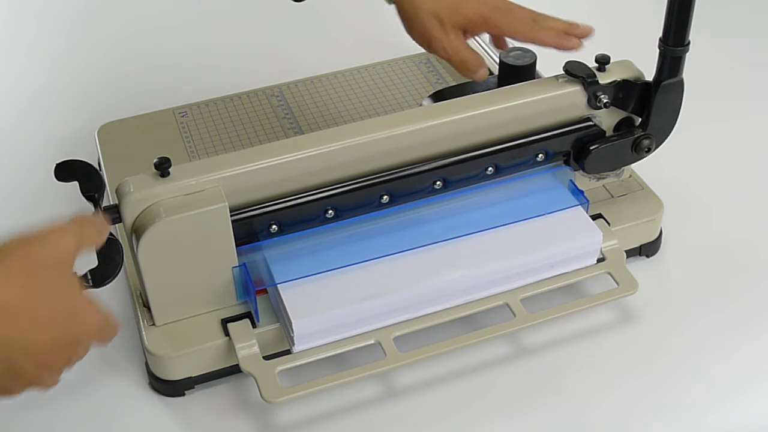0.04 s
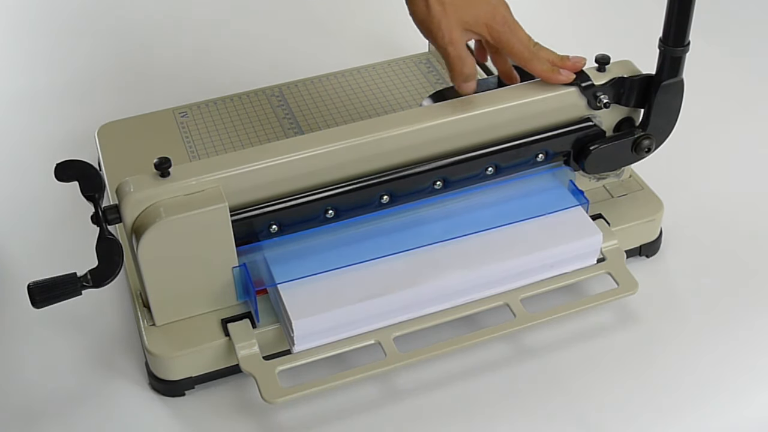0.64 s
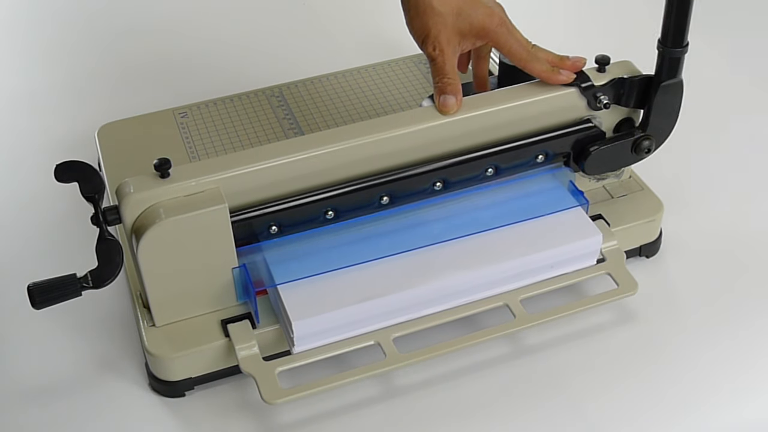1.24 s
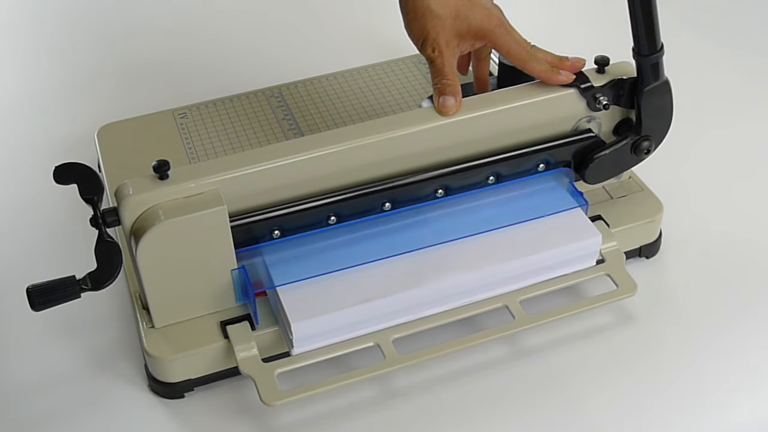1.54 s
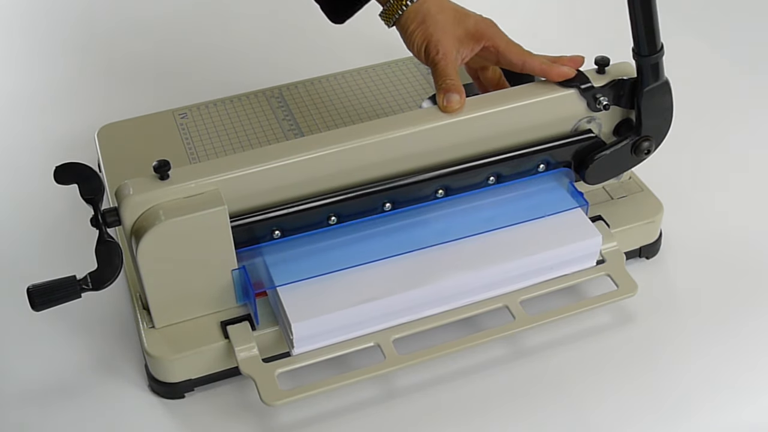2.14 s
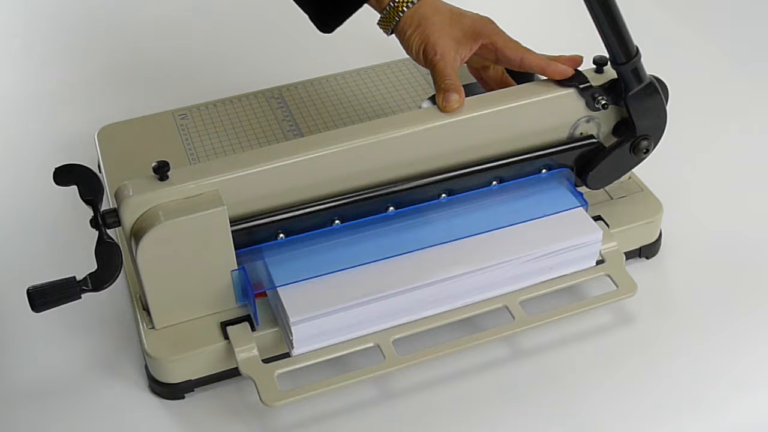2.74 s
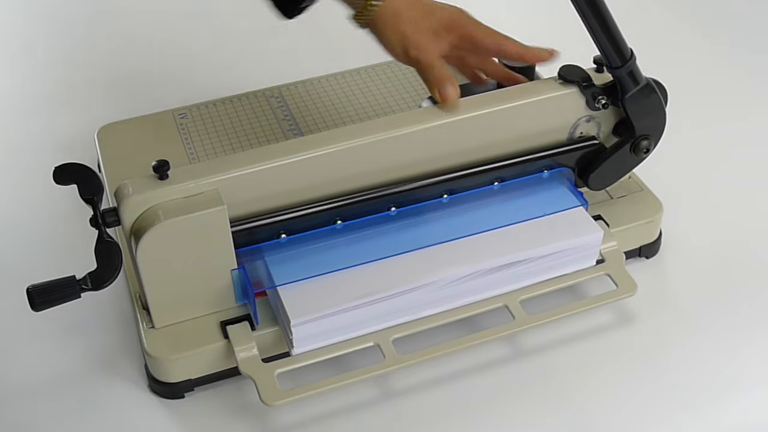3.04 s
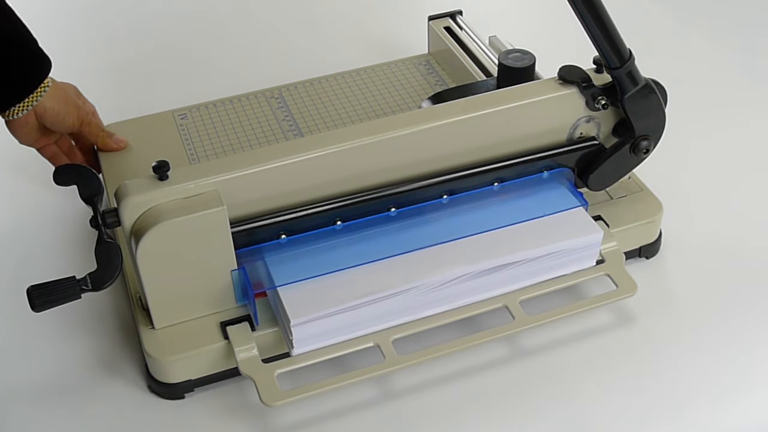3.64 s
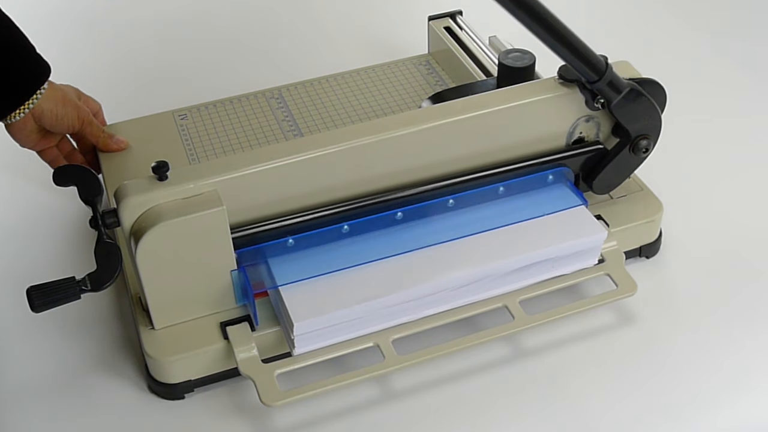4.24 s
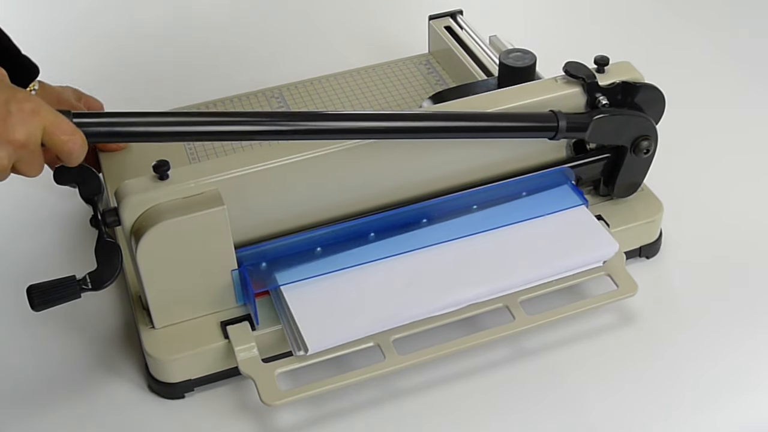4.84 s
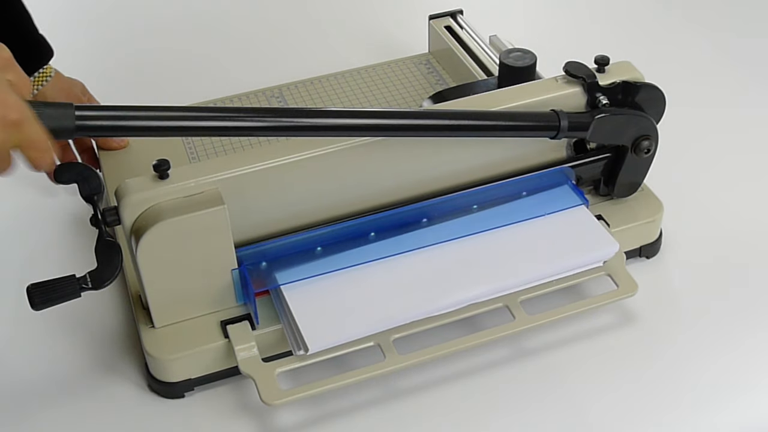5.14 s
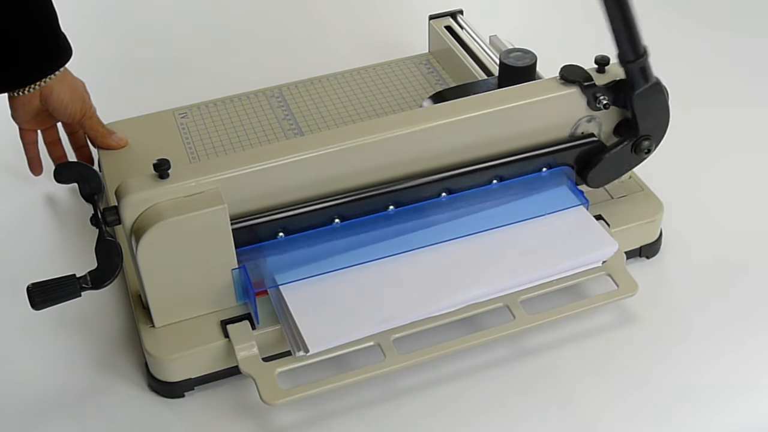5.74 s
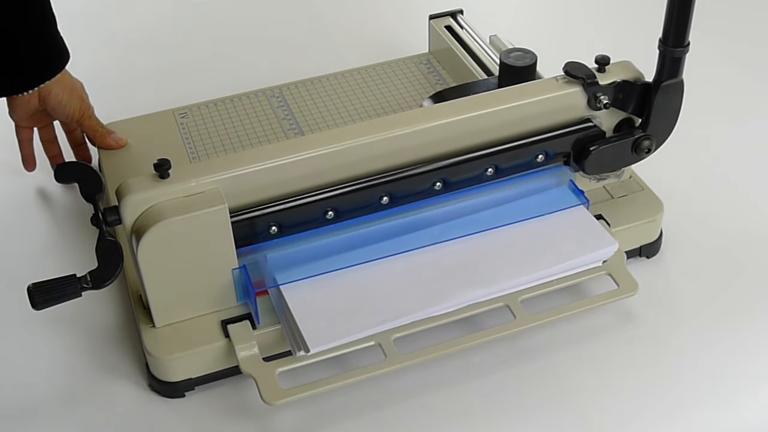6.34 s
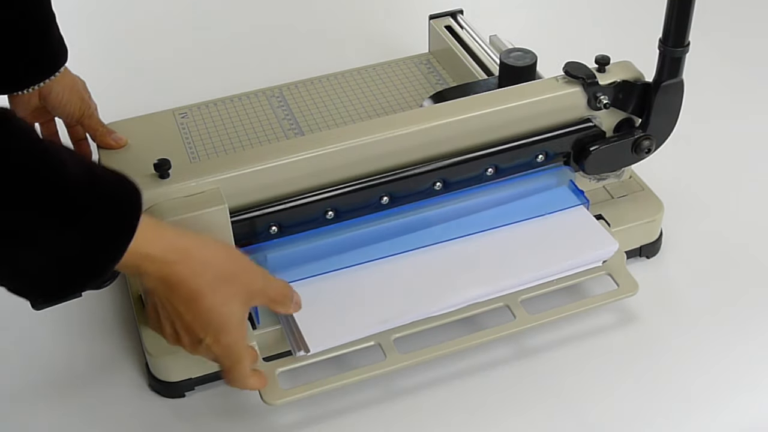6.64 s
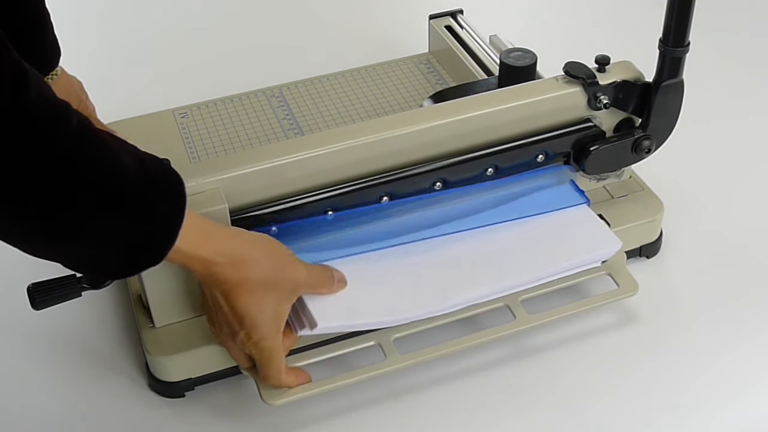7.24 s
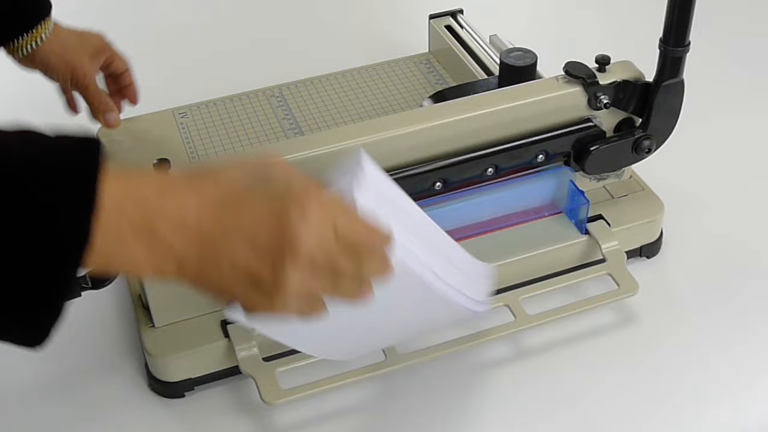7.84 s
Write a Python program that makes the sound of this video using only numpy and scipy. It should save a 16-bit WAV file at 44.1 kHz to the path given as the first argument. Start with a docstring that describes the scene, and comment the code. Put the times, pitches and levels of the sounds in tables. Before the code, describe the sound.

A heavy steel paper guillotine is worked on a table, heard close up in a bare room with short reverberation and a faint hum. At 0.2 seconds a small safety catch clacks. After a faint rub, a solid knock comes at 1.4 seconds. From about 2 to 3 seconds the lever slides with a soft scrape and low thumps, and the catch snaps again with a brief ring at 3 seconds. From 3.7 seconds the blade crunches through a paper stack, knocking near 4 seconds, growing louder and hissier until it thuds home at 4.7 seconds. The machine settles with a few thumps. The lever clanks back up at 5.3 and 5.9 seconds, followed by light knocks. From 7 seconds the cut strip is dragged out, rustling and crackling, with a sharp plastic guard clatter near 7.4 seconds and small ticks fading by 8 seconds.

```python
"""A heavy steel paper guillotine on a table in a bare room, heard in mono from close by.
The safety catch clacks, the lever knocks in its joints and slides, then the blade crunches through
a stack and thuds home. The lever clanks back up; the cut strip is pulled out, crackling, under a
clattering plastic guard. Each blow is a damped noise burst plus the ringing modes of steel or frame;
blade and paper are streams of tiny slips that swell with the force behind them."""
import sys
import numpy as np
from scipy import signal
from scipy.fft import rfft, irfft, next_fast_len
from scipy.io import wavfile

SR = 44100
rng = np.random.default_rng(int(sys.argv[2]) if len(sys.argv) > 2 else 0)


def to_wav(sig):
    """Store sig (one row per channel, or 1-D mono) as 16-bit WAV at the path in sys.argv[1].

    Samples outside -1..1 are clipped; the rate is SR.
    """
    pcm = np.clip(np.atleast_2d(sig), -1, 1) * 32767
    pcm = np.round(pcm).astype(np.int16)
    wavfile.write(sys.argv[1], SR, pcm.T)  # frames by channels


N = 356769


def amp(db):
    """Decibels to gain."""
    return 10 ** (np.asarray(db) / 20)


def unit(x):
    """x at rms 1."""
    return x / np.sqrt(np.mean(x ** 2) + 1e-20)


def along(points, hz):
    """Read a curve of (Hz, value) points on a log frequency axis."""
    point_hz, values = np.transpose(points)
    return np.interp(np.log(hz + 1), np.log(point_hz + 1), values)


def filtered(x, response):
    """Shape x with a gain given as a function of frequency."""
    size = next_fast_len(len(x) + 8192)
    return irfft(rfft(x, size) * response(np.fft.rfftfreq(size, 1 / SR)), size)[:len(x)]


def tinted(x, points):
    """Minimum-phase EQ through (Hz, dB) points, which keeps attacks sharp."""
    n = x.shape[-1]
    cepstrum = irfft(np.log(amp(along(points, np.fft.rfftfreq(n, 1 / SR)))), n)
    fold = np.r_[1, np.full(n // 2 - 1, 2), np.zeros(n - n // 2)]
    return irfft(rfft(x) * np.exp(rfft(cepstrum * fold)), n)


def band(x, lo, hi):
    """Steep causal band-pass."""
    edges = np.clip([lo, hi], 20, SR / 2 - 100)
    return signal.sosfilt(signal.butter(4, edges, btype="band", fs=SR, output="sos"), x)


def resonate(x, hz, q):
    """One damped resonance, gain 1 at its centre."""
    return signal.lfilter(*signal.iirpeak(hz, q, SR), x)


def add(track, start_s, x):
    """Mix x into the track from start_s."""
    part = track[round(start_s * SR):][:len(x)]
    part += x[:len(part)]


# Reverb time. Each row: frequency in Hz, t60 in seconds.
ROOM_DECAY = [(100, 1), (400, 0.89), (1500, 0.91), (4000, 0.73), (8000, 0.69), (15000, 0.3)]
# Tone of the reflections. Each row: frequency in Hz, gain in dB.
WALL_EQ = [(80, -10), (300, 4.5), (1000, -1.5), (3000, -3), (7000, -6.5), (11000, -2), (15000, -5)]

def room(x, early_db):
    """The bare room answers with near reflections and a tail that dies fastest in the treble."""
    hz, t, spectrum = signal.stft(rng.standard_normal(SR), SR, nperseg=256)
    late = amp(-60 * t / along(ROOM_DECAY, hz)[:, None])
    early = amp(early_db - 60 * t / 0.086)
    tail = signal.istft(spectrum * (late + early), SR, nperseg=256)[1]
    tail = filtered(tail / np.linalg.norm(tail), lambda f: amp(along(WALL_EQ, f)))
    predelay = round(0.004 * SR)
    return signal.fftconvolve(x, np.pad(tail, (predelay, 0)))[:len(x)]


# Colour of the room noise. Each row: frequency in Hz, relative level in dB.
AIR_EQ = [(15, -42), (25, -11), (108, -5), (317, -14), (384, -9), (427, -23), (463, -9), (516, -15.5),
          (591, -14), (1260, -18), (2910, -21.5), (7110, -29), (7710, -29), (16000, -38)]
# Hum and whine. Each row: frequency in Hz, level in dB.
HUM_TONES = [(106, -63), (14923, -76.5)]

def room_tone():
    """Steady room noise with a faint electrical hum and whine."""
    t = np.arange(N) / SR
    air = unit(filtered(rng.standard_normal(N), lambda f: amp(along(AIR_EQ, f))))
    hum = sum(amp(db) * np.sqrt(2) * np.sin(2 * np.pi * hz * t) for hz, db in HUM_TONES)
    return amp(-50.5) * air + hum


# Each row: centre time and length in seconds, centre frequency and bandwidth in Hz, level in dB.
RUB_SWELLS = [(0.152, 0.032, 3000, 700, -46.5), (.85, 0.52, 5900, 11100, -63),
              (1.027, 0.15, 5000, 9400, -53), (1.284, 0.11, 171, 125, -52.5),
              (4.711, 0.055, 754, 380, -21.5), (5.146, 0.05, 2690, 700, -43),
              (5.152, 0.09, 5300, 1400, -57.5), (6.737, 0.095, 490, 119, -57)]

def rubs():
    """Short swells of friction from hand, catch, pivot and the blade's last bite."""
    t, dry = np.arange(N) / SR, np.zeros(N)
    for centre_s, length_s, hz, width, db in RUB_SWELLS:
        envelope = np.exp(-(2 * (t - centre_s) / length_s) ** 4)
        friction = unit(band(rng.standard_normal(N), hz - width / 2, hz + width / 2))
        dry += amp(db) * envelope * friction
    return dry + amp(-1.5) * room(dry, early_db=13)


# The five bands of a blow: thud, knock, clack, crack and tick. Their edges in Hz, low to high.
BAND_EDGES = [76, 250, 1000, 2500, 6500, 16000]
BAND_CENTRES = np.sqrt(np.multiply(BAND_EDGES[:-1], BAND_EDGES[1:]))

def strike(colour_db, db, tilt, spot_hz, focus_db, reach_octaves=1.13):
    """Band levels of a blow in dB: tilted by the contact, favouring the struck spot's resonance."""
    away = 1 - np.exp(-(np.log2(BAND_CENTRES / spot_hz) / reach_octaves) ** 2)
    levels = db + tilt * np.log2(BAND_CENTRES / np.median(BAND_CENTRES)) - focus_db * away
    return levels[-len(colour_db):] + colour_db


def reverb_send(db, room_db, light_blow_db=-32.5):
    """Room share of a blow in dB: hard blows sound drier than light ones."""
    return room_db - 0.075 * (db - light_blow_db)


def ringing(modes, plate_modes, plate_db=-56):
    """The main modes at fresh strengths, plus any weak plate modes drawn anew for this blow."""
    plate_hz = rng.uniform(0.054, 1, plate_modes) ** 1.5 * 13000
    plate_t60 = rng.uniform(0.097, 0.33, plate_modes)
    plate = np.column_stack([plate_hz, np.full(plate_modes, plate_db), plate_t60])
    hz, db, t60 = np.vstack([modes, plate]).T[:, :, None]
    t = np.arange(SR * 2 // 3) / SR
    envelopes = amp(db + rng.normal(0, 3.25, hz.shape) - 60 * t / t60)
    partials = np.sin(2 * np.pi * (hz * t + rng.random(hz.shape)))
    return np.pad(np.sum(envelopes * partials, axis=0), (0, SR - len(t)))


# Burst decay from thud to tick: t60 in seconds, before each blow's length factor.
BURST_T60 = [0.087, 0.064, 0.048, 0.025, 0.025]

def blows(hits, modes, early_db, spot_db, spot_q, plate_modes=0):
    """Each blow is a quickly damped burst, coloured by the struck spot, plus the object's ring."""
    track, t = np.zeros(N), np.arange(SR) / SR
    onset = t < 0.03  # band levels are set over this stretch
    attack = 1 - np.exp(-t / 0.00024)
    contact = signal.butter(2, 12000, fs=SR)  # the contact's duration softens the very top
    for start_s, levels_db, spot_hz, length, room_db, ring_db in hits:
        ring = ringing(np.add(modes, [0, ring_db, 0]), plate_modes)
        noise = rng.standard_normal(SR) * attack
        sound = np.zeros((2, SR))  # direct sound and room feed
        for lo, hi, t60 in zip(BAND_EDGES, BAND_EDGES[1:], BURST_T60):
            burst = noise * amp(-60 * t / (t60 * length))
            # the room hears all sides of the object at once, so its feed is more even in colour
            impulse = np.linalg.norm(burst) * (t == 0)
            pair = np.array([burst, 0.5 * burst + 0.87 * impulse])
            pair = pair + amp(spot_db) * resonate(pair, spot_hz, spot_q) + ring * [[1], [0.5]]
            part = band(signal.lfilter(*contact, pair), lo, hi)
            sound += np.sqrt(hi - lo) * part / part[:, onset].std(axis=1, keepdims=True)
        density_db = levels_db - 10 * np.log10(np.diff(BAND_EDGES))
        direct, room_feed = tinted(sound, np.column_stack([BAND_CENTRES, density_db]))
        add(track, start_s, direct + amp(room_db) * room(room_feed, early_db))
    return track


# Ring of frame and table. Each row: frequency in Hz, relative level in dB, t60 in seconds.
FRAME_MODES = [(104.5, -18, 1), (180.6, -7, 0.32), (212.4, -14, 0.53), (316, -9, 0.16), (353.7, -12, 0.55),
               (371.5, -2, 0.091), (624, -4, 0.062), (700, -10, 0.13), (803, -11, 0.26)]
# Gain in dB for the four bands from knock to tick; each hit brings its own thud.
KNOCK_EQ = [0, -3, -4, -19.5]
# Each row: start in seconds, relative level and thud level in dB, tilt in dB per octave,
# resonance of the struck spot in Hz, length factor.
KNOCK_HITS = [(0.147, -41, -54, -5, 1250, 5.4), (1.43, -17, -29, -0.8, 826, 0.92),
              (2.232, -38, -40.5, -1, 780, 1.2), (2.619, -30, -37.5, -1, 2330, 2.3),
              (3.368, -39, -53.5, 4, 390, 1.6), (3.753, -35, -44, -2, 193, 2.5),
              (3.771, -29, -46, -4.5, 960, 0.78), (4.023, -24, -42.5, -1.2, 3220, 0.81),
              (4.0285, -24.5, -44.5, 1.6, 2380, 5.3), (4.714, -19, -35, 0, 784, 1.6),
              (4.726, -19, -27, 1.4, 338, 0.76), (5.188, -31.5, -32, 0.5, 200, 6.3),
              (6.025, -32.5, -38.5, -4.8, 860, 2.8), (6.264, -39.5, -41, -9.5, 640, 1.4),
              (7.397, -20, -42.5, 1.5, 715, 1.3), (7.434, -29.5, -71, 2.5, 1400, 2.1),
              (7.784, -29.5, -34, 0, 603, 0.8)]

def knocks(ring_db=-13.5):
    """Lever joints, blade and guard knock on the frame; their weight thuds through the table."""
    hits = []
    for start_s, db, thud_db, tilt, hz, length in KNOCK_HITS:
        levels = np.r_[thud_db, strike(KNOCK_EQ, db, tilt, hz, focus_db=7)]
        hits.append((start_s, levels, hz, length, reverb_send(db, room_db=-0.86), ring_db))
    return amp(-1) * blows(hits, FRAME_MODES, early_db=1.5, spot_db=7.5, spot_q=5.4)


# Ring of the catch. Each row: frequency in Hz, relative level in dB, t60 in seconds.
CATCH_RING = [(822, -33, 0.42), (1250, -13, 0.59), (1400, -18, 0.41), (2650, -32, 0.34), (2810, -13, 0.37),
              (3970, -21, 0.21), (3420, -29, .3), (5250, -17, 0.36), (5760, -34, 0.28), (6900, -20, 0.46),
              (8400, -15, 0.3), (11100, -24, 0.4)]
# Gain in dB for each band from thud to tick.
CATCH_EQ = [-26, -3.5, -1, -0.5, -5]
# Each row: start in seconds, relative level in dB, tilt in dB per octave, spot resonance in Hz,
# reverb send in dB, ring gain in dB.
CATCH_HITS = [(0.2384, -18.5, -1, 4750, 1, -27), (3.0468, -18.5, -1, 2900, -4, -13)]

def safety_catch(length=1.0):
    """The small steel catch snaps over and rings."""
    hits = [(start_s, strike(CATCH_EQ, db, tilt, hz, focus_db=10), hz, length, room_db, ring_db)
            for start_s, db, tilt, hz, room_db, ring_db in CATCH_HITS]
    return blows(hits, CATCH_RING, early_db=-3.5, spot_db=3, spot_q=2.1, plate_modes=60)


# Gain in dB for each band from thud to tick.
THUMP_EQ = [0, 1.5, -1, -17, -36]
# Each row: start in seconds, relative level in dB, spot resonance in Hz.
THUMP_HITS = [(1.432, -16.5, 343), (1.978, -39, 165), (2.33, -29.5, 193), (2.43, -26.5, 225),
              (2.511, -30.5, 230), (2.724, -27.5, 228), (3.021, -30.5, 240), (3.537, -38, 114),
              (4.054, -22.5, 352), (4.271, -34, 128), (4.755, -14, 188), (4.825, -25, 191),
              (4.93, -21.5, 204), (5.005, -28.5, 210), (6.17, -26, 111), (7.919, -36, 259)]

def thumps(length=1.04, ring_db=-16):
    """The machine shifts and settles on the table; each soft contact shakes mainly one low resonance."""
    hits = []
    for start_s, db, hz in THUMP_HITS:
        levels = strike(THUMP_EQ, db, tilt=0, spot_hz=hz, focus_db=24.5)
        hits.append((start_s, levels, hz, length, reverb_send(db, room_db=-4), ring_db))
    return amp(-0.5) * blows(hits, FRAME_MODES, early_db=2, spot_db=4.5, spot_q=7.4)


def grains(per_s, spread_db, smooth):
    """Tiny slips and fibre breaks of uneven size over a smooth rub."""
    size = amp(spread_db * np.minimum(rng.exponential(size=N), 4))
    slips = (rng.random(N) < per_s / SR) * size * rng.choice([-1, 1], N)
    return unit(unit(slips) + smooth * rng.standard_normal(N))


def swell(start_s, peak_s, db, growth_db_per_s, fall_db_per_s=262, grip_s=0.082):
    """Envelope of a rub: friction takes hold, grows at a set rate and dies away after peak_s."""
    t = np.arange(N) / SR
    grip = np.clip((t - start_s) / grip_s, 0, 1)
    below_peak_db = growth_db_per_s * (peak_s - np.clip(t, start_s, peak_s))
    fallen_db = fall_db_per_s * np.maximum(t - peak_s, 0)
    return grip * amp(db - below_peak_db - fallen_db)


# Colour of the scrape. Each row: frequency in Hz, relative level in dB.
SCRAPE_EQ = [(41, -41.5), (70, -7), (103, 6.5), (142, -5), (182, -0.5), (250, -8), (368, 0), (462, -8.5),
             (934, -4), (1230, -11.5), (1340, -7.5), (5370, -19.5), (7730, -21), (9060, -21),
             (16000, -34.5)]
# Resonances of the blade. Each row: frequency and bandwidth in Hz, relative level in dB.
BLADE_MODES = [(386, 64, -7), (940, 390, -3.5), (1303, 38, -2), (1890, 170, -9), (4420, 31, -7)]

def stroke(slips, layers, start_s, peak_s, blade_db, room_db):
    """Friction shakes blade and frame: a groan, a scrape and a hiss, each with its own swell."""
    def blade(f):
        return sum(amp(db) * 1j * f * width / (hz * hz - f * f + 1j * f * width)
                   for hz, width, db in BLADE_MODES)
    scrape = filtered(slips, lambda f: amp(along(SCRAPE_EQ, f)) * (1 + amp(blade_db) * blade(f)))
    edges_hz = [80, 450, 4000, 16000]
    dry = sum(swell(start_s, peak_s, db, growth) * unit(band(scrape, lo, hi))
              for (db, growth), lo, hi in zip(layers, edges_hz, edges_hz[1:]))
    return dry + amp(room_db) * room(dry, early_db=2)


# Groan, scrape and hiss of the slide. Each row: peak level in dB, growth in dB per second.
SLIDE_LAYERS = [(-52, 0), (-37.5, 11), (-50.5, 5)]

def lever_slide():
    """The lever slides in its guides, barely stirring the blade."""
    slips = grains(per_s=1200, spread_db=-0.5, smooth=0.98)
    return stroke(slips, SLIDE_LAYERS, start_s=2.15, peak_s=2.865, blade_db=-32, room_db=-2.5)


# Gain in dB for each band from thud to tick.
SNAP_EQ = [-26.5, -8, -2, 0.5, -7.5]
# Each row: start in seconds, relative level in dB, tilt in dB per octave, spot resonance in Hz.
SNAP_HITS = [(2.187, -44.5, 0.2, 7000), (2.4508, -32, -2, 2110), (4.231, -41, -2.5, 4000),
             (6.266, -44, -2.5, 7000), (6.67, -63, 2.5, 7900), (6.846, -43.5, -3.5, 7900),
             (7.045, -58, 1, 4000), (7.0907, -33, 0, 2580), (7.105, -52, 3.5, 9000),
             (7.121, -46, 4.5, 9000), (7.1722, -38, 2.5, 9300), (7.263, -40, 0, 3370),
             (7.346, -38.5, 5, 3340), (7.4576, -15, -0.5, 2400), (7.6376, -37, 5, 2640),
             (7.765, -43.5, 1.5, 5900), (7.873, -48, -1, 6000)]

def snaps(length=0.71, ring_db=-24):
    """Paper edges and plastic snap: short clicks that hardly ring the frame."""
    hits = []
    for start_s, db, tilt, hz in SNAP_HITS:
        levels = strike(SNAP_EQ, db, tilt, hz, focus_db=13)
        hits.append((start_s, levels, hz, length, reverb_send(db, room_db=-0.9), ring_db))
    return amp(-2) * blows(hits, FRAME_MODES, early_db=3, spot_db=-8, spot_q=2.7)


# Groan, scrape and hiss of the cut. Each row: peak level in dB, growth in dB per second.
CUT_LAYERS = [(-36, 11.4), (-27.5, 15.2), (-34, 25)]

def blade_cut():
    """The blade crunches through the stack; the harder it bites, the more it hisses."""
    slips = grains(per_s=2000, spread_db=2.5, smooth=1.0)
    return stroke(slips, CUT_LAYERS, start_s=3.74, peak_s=4.72, blade_db=2.5, room_db=-9)


# Ring of the lever. Each row: frequency in Hz, relative level in dB, t60 in seconds.
LEVER_MODES = [(1153, -18.5, 0.46), (1870, -38, 0.47), (2627, -28, .48), (5000, -23, 0.4),
               (4730, -16, 0.22), (5100, -20, 0.36), (6460, -36, 0.55), (7830, -5, 0.13), (7900, -16, 0.35),
               (9300, -13, 0.26)]
# Gain in dB for each band from thud to tick.
CLANK_EQ = [-13, -3, -3.5, 1, -8]
# Each row: start in seconds, relative level in dB, tilt in dB per octave, spot resonance in Hz,
# length factor, ring gain in dB.
CLANK_HITS = [(5.301, -18, 0.5, 910, 0.83, -29), (5.3071, -24.5, -0.7, 3760, 0.51, -29),
              (5.859, -21.5, 1.1, 3170, 1, -10)]

def lever_clanks(room_db=-1.66):
    """Steel on steel: the lever swings back up, clanking in its joint and against its stop."""
    hits = [(start_s, strike(CLANK_EQ, db, tilt, hz, focus_db=8), hz, length, room_db, ring_db)
            for start_s, db, tilt, hz, length, ring_db in CLANK_HITS]
    return blows(hits, LEVER_MODES, early_db=-7.5, spot_db=-8, spot_q=12, plate_modes=70)


# Colour of the paper. Each row: frequency in Hz, relative level in dB.
RUSTLE_EQ = [(180, -44), (300, -11), (343, -17), (372, -2), (494, 0), (737, 4), (1750, 0.5), (3190, -8),
             (4160, -5.5), (15000, -11.5), (16000, -19)]
# Timing of rub, crackle and chatter. Each row: start and peak in seconds.
STRIP_TIMES = [(7.1, 7.46), (7.06, 7.28), (7.2, 7.37)]
# The same three layers. Each row: peak level in dB, growth and fall in dB per second.
STRIP_SWELLS = [(-34, 44, 120), (-40.5, 66, 38), (-38.5, 6, 800)]

def paper_strip(jerks_per_s=140, jerk_count=2000):
    """The strip is dragged out: its face rubs, its fibres crackle, its jerking edges ring the guard."""
    def rustle(slips):
        return filtered(slips, lambda f: amp(along(RUSTLE_EQ, f)))
    rub = unit(band(rustle(grains(per_s=1500, spread_db=8, smooth=0.65)), 330, 3100))
    crackle = unit(band(rustle(grains(per_s=450, spread_db=3, smooth=0.78)), 1740, 18000))
    strengths = amp(rng.normal(0, 4, jerk_count))
    gaps = rng.uniform(0.2, 1.8, jerk_count) * SR / jerks_per_s
    jerks = np.zeros(N)
    jerks[np.cumsum(gaps).astype(int).clip(0, N - 1)] = strengths
    chatter = unit(resonate(resonate(jerks, 3270, q=4.9), 3100, q=3))
    dry = sum(swell(*times, *shape) * layer
              for times, shape, layer in zip(STRIP_TIMES, STRIP_SWELLS, (rub, crackle, chatter)))
    return dry + amp(-8.5) * room(dry, early_db=0)


def scene():
    """The whole guillotine over the room tone, alike on both channels."""
    strokes = lever_slide() + blade_cut()
    impacts = safety_catch() + lever_clanks() + knocks() + thumps() + snaps()
    mono = strokes + impacts + paper_strip() + rubs() + room_tone()
    return np.array([mono, mono])


def record(dry, ceiling=0.95, top_hz=16000):
    """The recorder rounds off the highest peaks, cuts a narrow treble notch and limits the band."""
    rounded = dry / (1 + np.abs(dry / ceiling) ** 6) ** (1 / 6)
    notched = signal.lfilter(*signal.iirnotch(7440, Q=45, fs=SR), rounded)
    return np.array([filtered(channel, lambda hz: hz < top_hz) for channel in notched])


dry = scene()
out = record(dry)
to_wav(out)
```